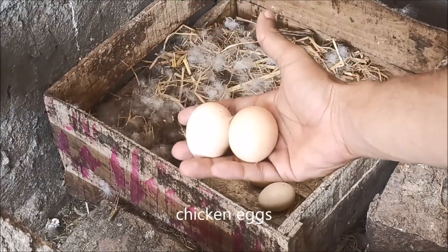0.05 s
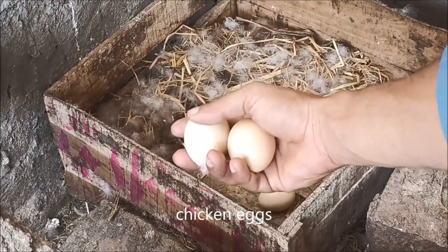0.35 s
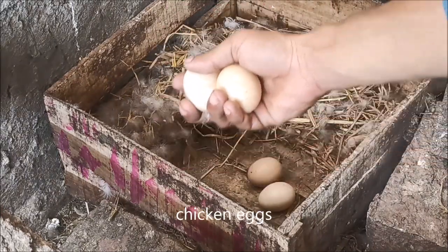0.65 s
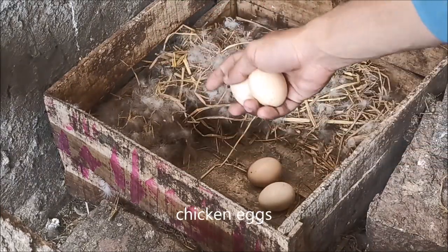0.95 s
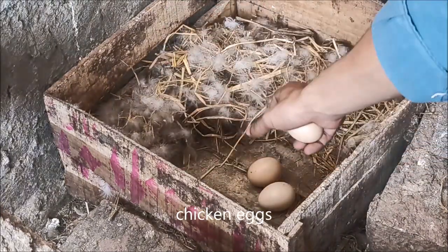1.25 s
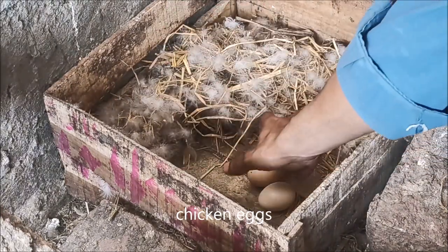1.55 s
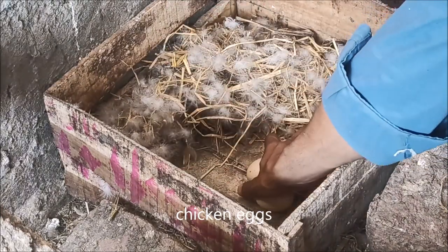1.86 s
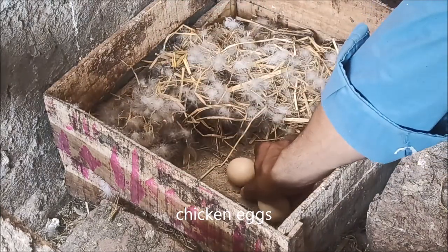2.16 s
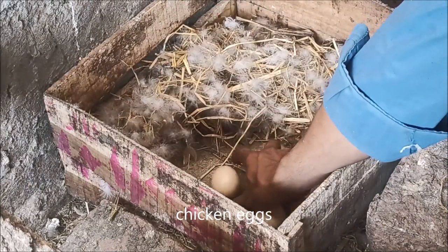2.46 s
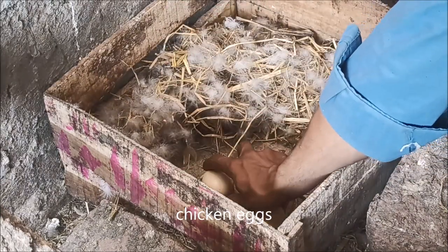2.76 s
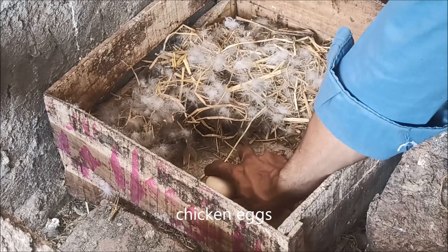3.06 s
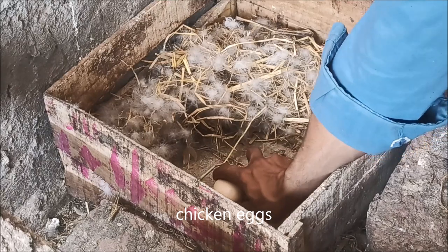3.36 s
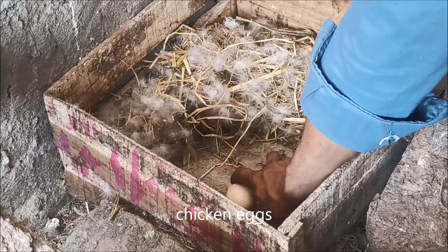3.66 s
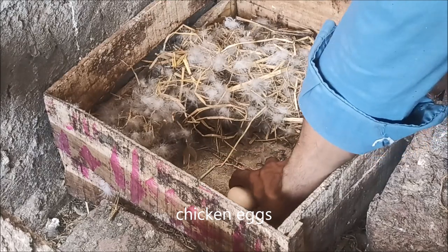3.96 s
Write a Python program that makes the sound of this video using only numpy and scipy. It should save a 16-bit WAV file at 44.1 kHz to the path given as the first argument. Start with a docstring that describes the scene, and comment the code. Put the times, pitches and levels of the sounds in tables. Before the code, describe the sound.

A duck hisses three times, close up in a quiet yard. First come a tiny tick, soft breathy peeps and a dull bump at 0.5 seconds. The loud hisses run from about 0.7 to 1.4, 2.0 to 2.6 and 3.4 to 4 seconds, each a rush of air that whistles, then ends in a fluttering rasp and small squeak. Weak pants and peeps fall between, over a faint low hum.

```python
"""At a wooden nest box in a quiet yard, close up, on one microphone.
A duck hidden by the box hisses three times while a hand lays eggs in the straw. Each hiss is air
rushing through the windpipe: it whistles on the pipe's resonances at its crest and ends in a
fluttering rasp. The bird also pants and peeps softly, and the boards give short reflections.
There is one small tick, one dull bump and a faint low hum throughout."""
import sys
import numpy as np
from scipy import signal
from scipy.fft import rfft, irfft
from scipy.io import wavfile

SR = 44100
rng = np.random.default_rng(int(sys.argv[2]) if len(sys.argv) > 2 else 0)


def wav_out(sig):
    """Save sig, one row per channel (or a flat mono array), as 16-bit PCM at SR to the path in sys.argv[1]."""
    wavfile.write(sys.argv[1], SR, np.round(np.clip(np.atleast_2d(sig).T, -1, 1) * 32767).astype(np.int16))


N = 176400


def undb(db):
    """Decibels to gain."""
    return 10 ** (np.asarray(db) / 20)


def unit(x):
    """Scale to rms 1."""
    return x / np.sqrt(np.mean(x ** 2))


def bell(x):
    """Smooth hump, 1 at zero."""
    return np.exp(-np.minimum(x ** 2, 60))


def freqs():
    """Frequency of every spectral bin."""
    return np.arange(N // 2 + 1) * SR / N + 1e-3


def noise(gain):
    """Noise of rms 1, shaped by a gain per bin."""
    return unit(irfft(rfft(rng.standard_normal(N)) * gain, N))


def colour(points):
    """Gain per bin from (Hz, dB) points."""
    hz, db = np.array(points).T
    return undb(np.interp(np.log(freqs()), np.log(hz), db))


def walk(rate_hz):
    """Smooth random motion of spread 1."""
    return noise(1 / (1 + (freqs() / rate_hz) ** 2))


def tone(hz, width_hz, rough):
    """A sine partly broken up into narrow noise; rough runs from 0 to 1."""
    phase = 2 * np.pi * (np.cumsum(hz * np.ones(N)) / SR + rng.random())
    amplitude = np.sqrt(2 * (1 - rough ** 2)) + rough * walk(width_hz)
    return amplitude * np.sin(phase) + rough * walk(width_hz) * np.cos(phase)


# Ambience of the yard (frequency [Hz], relative level [dB])
YARD_SPECTRUM = [(15, -31), (25, 3.5), (217, -9.5), (354, -12.5), (575, -23.5), (1290, -16), (1700, -28),
                 (2690, -26.5), (4030, -39.5), (4610, -31.5), (6920, -36), (10400, -66), (16000, -61)]
# Low hum in the background (frequency [Hz], level [dB])
HUM_TONES = [(98, -58.5), (155, -58.5)]

def yard():
    """The quiet bed of the place, with a wavering low hum."""
    ambience = undb(-54) * noise(colour(YARD_SPECTRUM))
    return ambience + sum(undb(db) * tone(hz, width_hz=24, rough=.42) for hz, db in HUM_TONES)


def tick(t, at_s=.058, half_s=.0019, hz=7000):
    """One light handling tick: a very short burst of treble noise."""
    return undb(-46.5) * bell((t - at_s) / half_s) * noise(bell((freqs() - hz) / 1600))


# Raspy breath, in the peeps and at the end of each hiss (frequency [Hz], relative level [dB])
RASP_SPECTRUM = [(120, -86), (200, -55.5), (254, -47.5), (340, -12.5), (529, -19), (590, -15.5), (899, -1),
                 (1020, -27), (1210, 10), (1320, -16), (1450, 8), (2330, -11), (3620, -11.5), (6050, -13.5),
                 (7140, -18), (8120, -38), (16000, -47)]
# Peeps by the box (top of the arch [s], rise [s], fall [s], top pitch [Hz], level [dB],
# lag of the loudest point [s], overtone offset [dB], relative breath level [dB])
PEEP_CALLS = [(.128, 0.015, 0.029, 1133, -36.5, 0.0016, -26, -13),
              (0.207, 0.034, 0.04, 1280, -30.5, 0.0096, -4, -10.5),
              (0.288, .03, 0.042, 1378, -27.5, -0.01, -25, -8.5),
              (0.406, 0.027, 0.031, 1465, -30.5, -0.0032, -4.5, -10),
              (0.529, .025, 0.041, 1507, -31.5, -0.0062, -14.5, -7),
              (.649, 0.0094, 0.01, 1213, -36.5, -0.0033, -18, -22),
              (0.67, 0.024, 0.04, 1364, -36, -0.0066, -3.5, -2.5),
              (1.12, 0.052, 0.056, 1223, -27, -0.0074, 1, 0),
              (1.25, 0.051, 0.045, 1223, -22.5, -0.01, -30, -23),
              (1.571, 0.038, 0.14, 1059, -49, 0.032, -13, -10),
              (1.698, 0.087, 0.11, 970, -51, 0.0083, -24, -19),
              (1.892, .075, 0.058, 1426, -45.5, -0.021, -13, -12),
              (2.01, 0.036, .05, 1050, -46.5, 0.0093, -20, -11),
              (2.72, .07, 0.08, 1013, -48, -0.021, -8, -15),
              (2.772, 0.039, 0.031, 1400, -37.5, 0.054, 0.5, -14),
              (2.871, 0.05, .031, 1490, -32.5, 0.025, -6, -6.5),
              (2.979, 0.023, 0.032, 1470, -42, 0.015, -4, -23),
              (3.063, 0.032, .023, 1961, -31, .004, 0, -13),
              (3.086, 0.0087, 0.017, 1077, -25.5, 0.011, 2, -4),
              (3.194, 0.06, 0.052, 1250, -41.5, -0.0094, -27, -5),
              (3.254, 0.028, .03, 1627, -23.5, .006, 1.5, -32),
              (3.756, 0.056, 0.082, 1614, -23, -0.025, -4, -11.5),
              (3.99, 0.12, 0.013, 1021, -33.5, 0.037, -5, -21)]

def peeps(t, rough=.72, width_hz=120, limit_oct=1.25, overtone_step_db=-5):
    """Breathy whistles whose pitch arches up and drops away."""
    out, breath = np.zeros(N), noise(colour(RASP_SPECTRUM))
    steady = np.sqrt(2 * (1 - rough ** 2))
    widths_hz = width_hz * np.sqrt([1, 2, 3, 4])  # one per harmonic
    wobbles = [steady + rough * (walk(width) + 1j * walk(width)) for width in widths_hz]
    for top, rise, fall, hz, db, lag, overtone_db, breath_db in PEEP_CALLS:
        near = np.abs(t - top) < .2
        u = t[near] - top
        drop_oct = np.where(u < 0, .36 * (u / rise) ** 2, .8 * (u / fall) ** 2)
        pitch = hz * 2 ** -(limit_oct * np.tanh(drop_oct / limit_oct))
        phase = 2 * np.pi * np.cumsum(pitch) / SR
        attack, release = .58 * max(rise + lag, .01), .97 * max(fall - lag / 2, .01)
        swell = undb(-8 * ((u - lag) / np.where(u < lag, attack, release)) ** 2)
        voice = undb(breath_db) * breath[near]
        for k, wobble in enumerate(wobbles, 1):
            gain = undb(overtone_db + overtone_step_db * (k + .5)) if k > 1 else 1
            voice += gain * np.real(wobble[near] * np.exp(1j * k * phase))
        out[near] += undb(db) * swell * voice
    return signal.sosfilt(signal.butter(4, 620, "high", fs=SR, output="sos"), out)


def box_reflections(x, t, t60_s=.07, wet_db=-8):
    """Short, dense reflections reach the microphone from the boards and the wall."""
    tail = rng.standard_normal(N) * np.exp(-np.log(1000) * t / t60_s) * (t > .002)
    wet = signal.fftconvolve(x, tail / np.sqrt(np.sum(tail ** 2)))[:N]
    return (x + undb(wet_db) * wet) / np.sqrt(1 + undb(wet_db) ** 2)


def pipe_ring(spacing_hz=255, width_hz=20, scatter_db=2):
    """Turbulence ringing in the windpipe's row of resonances, which widen towards the treble."""
    f, response = freqs(), 0
    for k in range(2, 32):
        detuning = (f - k * spacing_hz) / (width_hz * (1 + k / 20))
        response += undb(scatter_db * rng.standard_normal()) / (1 + detuning ** 2)
    return noise(response)


def breath_spectrum(ringing, points, ring_mix):
    """Spectrum of ringing air and plain rush, mixed and given one colour."""
    air = np.sqrt(ring_mix) * ringing + np.sqrt(3 * (1 - ring_mix)) * rng.standard_normal(N)
    return rfft(air) * colour(points)


# Panting breath (frequency [Hz], relative level [dB])
PANT_SPECTRUM = [(240, -80), (400, -20), (777, -9), (994, -8), (1090, -14.5), (1200, -8.5), (1960, -15),
                 (2670, -10), (3120, -16), (4110, -12), (6850, -14), (16000, -43)]
# Puffs by the box (time [s], half length [s], level [dB])
PANT_PUFFS = [(0.297, .03, -29.5), (0.73, 0.035, -47.5), (1.519, .03, -40), (1.675, 0.032, -39.5),
              (1.814, .03, -41), (1.945, 0.032, -43), (2.682, 0.029, -45), (2.8, 0.026, -46.5),
              (2.887, .025, -47.5), (3.014, 0.029, -49.5), (3.091, 0.012, -40.5), (3.133, 0.021, -44),
              (3.266, 0.028, -41.5)]

def pants(t):
    """The bird's short puffs of air, a little hollow from the windpipe."""
    air = unit(irfft(breath_spectrum(pipe_ring(), PANT_SPECTRUM, ring_mix=.4), N))
    return air * sum(undb(db) * bell((t - s) / half) for s, half, db in PANT_PUFFS)


def windpipe(ringing, points, ring_mix, region_hz=700, wander_db=2.4, split_hz=2380):
    """Rushing air as a throat band and a treble band; broad regions swell as the bill moves."""
    spectrum = breath_spectrum(ringing, points, ring_mix)
    position = np.minimum(freqs() / region_hz, 11)
    air = np.zeros(N)
    for k in range(12):
        region = irfft(spectrum * np.clip(1 - np.abs(position - k), 0, 1), N)
        air += region * undb(wander_db * walk(rate_hz=16))
    low = 1 / np.sqrt(1 + (freqs() / split_hz) ** 12)
    return [unit(irfft(rfft(air) * band, N)) for band in (low, np.sqrt(1 - low ** 2))]


# Open rush that starts a hiss (frequency [Hz], relative level [dB])
RUSH_SPECTRUM = [(120, -62), (200, -30), (245, -32), (380, -22.5), (473, -16), (647, -18), (777, -9),
                 (1120, -5.5), (1480, 0), (1740, -6), (1840, -8.5), (1980, -11.5), (2650, -12.5),
                 (5230, -11), (7410, -21.5), (10900, -47), (16000, -48.5)]
# Airflow, one curve per hiss (time [s], level [dB], treble offset [dB])
HISS_FLOW = [
    [(0.73, -45, 0), (0.768, -22, -4), (0.934, -24, 4), (0.942, -19, -4.5), (1.044, -21.5, 0.5),
     (1.08, -26.5, 8.5), (1.12, -26.5, 6), (1.21, -27, -3.5), (1.242, -23, -6), (1.35, -25.5, 4),
     (1.41, -32.5, 10.5), (1.426, -42, 7), (1.448, -42.5, 0), (1.47, -56, 0)],
    [(2.02, -49, -26), (2.024, -47, -2), (2.048, -20.5, -9.5), (2.076, -24, 0.5), (2.26, -20.5, -4),
     (2.296, -20, -2.5), (2.34, -22, -1), (2.38, -24, 1), (2.5, -21.5, -6.5), (2.516, -25, 1.5),
     (2.53, -30.5, 3), (2.586, -39, -7), (2.596, -70, -11), (2.61, -59.5, -19)],
    [(3.37, -66, 0), (3.384, -51.5, 8.5), (3.388, -49.5, -8), (3.418, -29, -13.5), (3.45, -22.5, -9),
     (3.544, -21.5, 0), (3.742, -20.5, -3.5), (3.826, -27.5, 6.5), (3.838, -20, -5), (3.91, -29.5, 9),
     (3.92, -39.5, 9.5), (3.96, -44.5, -2), (3.99, -61, -3)],
]
# Course of each hiss (crest [s], half length of the whistling [s], rasp onset [s],
# flutter depth [0-1], closing squeak [s], favoured resonance [Hz], second favoured resonance [Hz])
HISS_STAGES = [(.98, .11, 1.2, .9, 1.4, 1038, 3832), (2.245, .125, 2.39, .45, 2.54, 1038, 2072),
               (3.635, .115, 3.75, .55, 3.9, 1765, 2550)]
# Windpipe resonances that whistle (frequency [Hz], relative level [dB], effort where it speaks [0-1])
PIPE_WHISTLES = [(813, -9, .35), (1038, -9, .92), (1190, -13, .95), (1512, -1, .45), (1765, -6, .9),
                 (1930, -14, .95), (2072, -11, .9), (2330, -9, .4), (2550, -13, .85), (2790, -15, .7),
                 (3832, -14, .9), (4880, -15, .7), (5550, -16, .95)]

def hisses(t, flutter_hz=178, flutter_jitter=.0361, crest_dip_db=-7, favour_db=7):
    """Open rush, whistles that come and go with effort, then a fluttering rasp closing on a squeak."""
    out, ringing = np.zeros(N), pipe_ring()
    throat, treble = windpipe(ringing, RUSH_SPECTRUM, ring_mix=.7)
    rasp, rasp_treble = windpipe(ringing, RASP_SPECTRUM, ring_mix=.4)
    beat = np.sin(2 * np.pi * np.cumsum(flutter_hz * (1 + flutter_jitter * walk(29.5))) / SR)
    whistles = [tone(hz, width_hz=10, rough=.45) for hz, _, _ in PIPE_WHISTLES]
    chest = tone(157.2, width_hz=42, rough=.66)
    squeak = tone(2240, width_hz=52, rough=.23)
    for curve, (crest, half, rasp_s, depth, close_s, *favoured) in zip(HISS_FLOW, HISS_STAGES):
        times, flow_db, treble_db = np.array(curve).T
        gate = np.clip(np.minimum(t - times[0], times[-1] + .059 - t) / .023, 0, 1)
        flow = undb(np.interp(t, times, flow_db)) * gate
        bright = undb(np.interp(t, times, treble_db) - 1.5)
        effort = 1 - ((t - crest) / half) ** 2
        rush = throat * undb(-2 + crest_dip_db * np.clip(effort, 0, 1)) + bright * treble
        # The rush crossfades into the rasp, where one resonance squeals up 0.45 octave.
        rasp_mix = np.clip((t - rasp_s) / .05 + .5, 0, 1)
        rising = np.clip((t - rasp_s) / (close_s - rasp_s), 0, 1)
        squeal = undb(-9) * tone(1313 * 2 ** (.45 * rising), width_hz=134, rough=.73)
        flutter = (1 + depth * beat) / np.sqrt(1 + depth ** 2 / 2)
        rasping = flutter * (undb(-1) * rasp + squeal + bright * rasp_treble)
        air = np.sqrt(1 - rasp_mix) * rush + np.sqrt(rasp_mix) * rasping
        for whistle, (hz, db, speaks) in zip(whistles, PIPE_WHISTLES):
            lift_db = favour_db * bell((hz - np.array(favoured)) / 90).max()
            air += undb(db + lift_db - 1.5) * bell((effort - speaks) / .33) * whistle
        air += undb(4) * bell((t - close_s) / .011) * squeak
        air += undb(-28 + 3 * rasp_mix) * chest
        out += flow * air
    return out


def scene():
    """The bird by the box, the hand and the yard, heard from one spot in mono."""
    t = np.arange(N) / SR
    bird = box_reflections(hisses(t) + peeps(t) + pants(t), t)
    return (bird + tick(t) + bump(t) + yard())[None]


def record(dry, low_cut_hz=83, top_hz=15850):
    """Behind the microphone, the recorder thins the deep bass and cuts the top."""
    thin = signal.sosfilt(signal.butter(2, low_cut_hz, "high", fs=SR, output="sos"), dry)
    return signal.sosfilt(signal.ellip(10, .2, 80, top_hz, fs=SR, output="sos"), thin)


# Knocks that make up the bump (time [s], level [dB], pitch [Hz], time to fall 60 dB [s])
BUMP_KNOCKS = [(.485, -28, 98, 0.22), (0.5102, -5.5, 151, 0.034), (.527, -15, 99, 0.092),
               (0.547, -22, 106, 0.067)]

def bump(t, overtone_hz=268.5, overtone_db=-13.5, attack_s=.0019):
    """One dull handling bump with small rebounds, each a low ring that dies quickly."""
    out = np.zeros(N)
    for s, db, hz, t60 in BUMP_KNOCKS:
        age = np.maximum(t - s, 0)
        ring = np.sin(2 * np.pi * hz * age) + undb(overtone_db) * np.sin(2 * np.pi * overtone_hz * age)
        envelope = (1 - np.exp(-age / attack_s)) * np.exp(-np.log(1000) * age / t60)
        out -= undb(db) * ring * envelope
    return out


dry = scene()
out = record(dry)
wav_out(out)
```